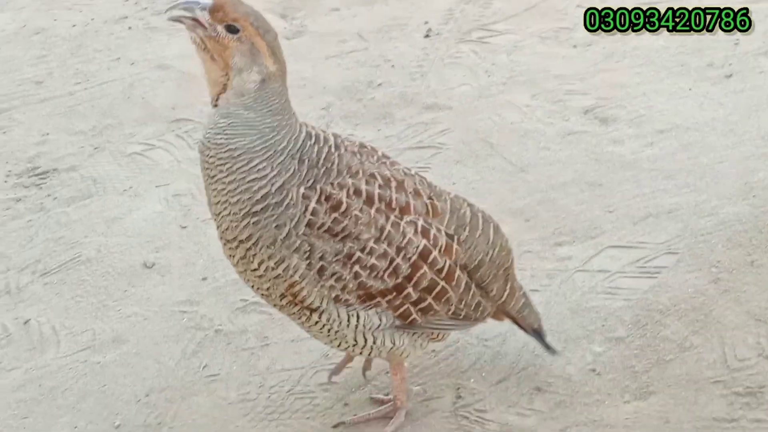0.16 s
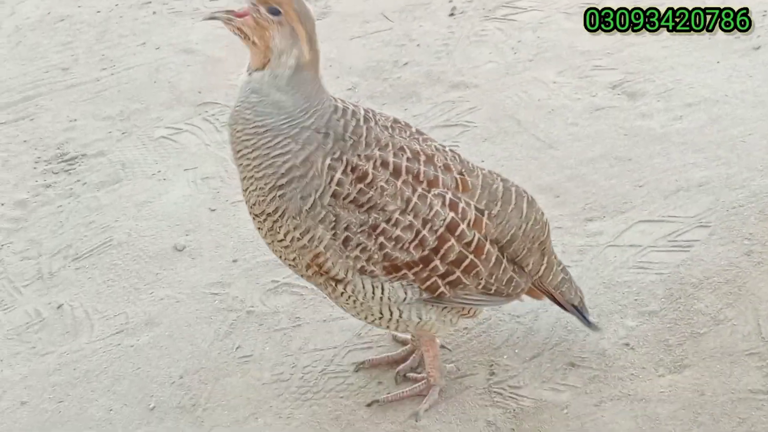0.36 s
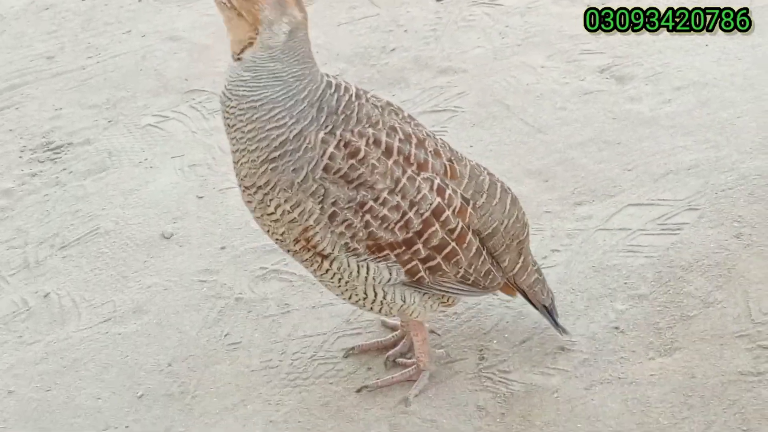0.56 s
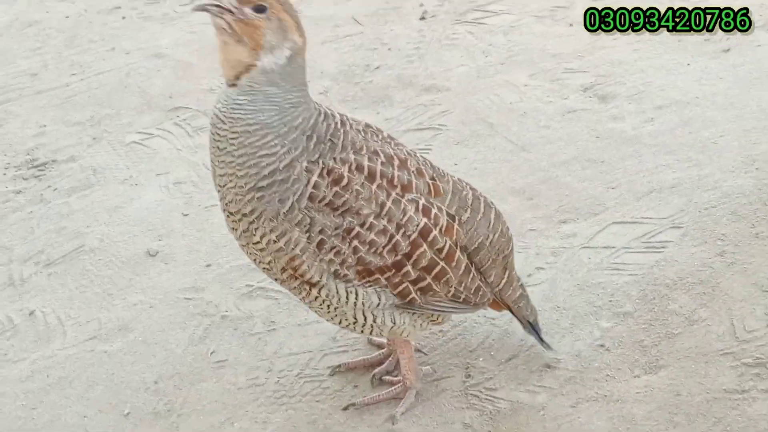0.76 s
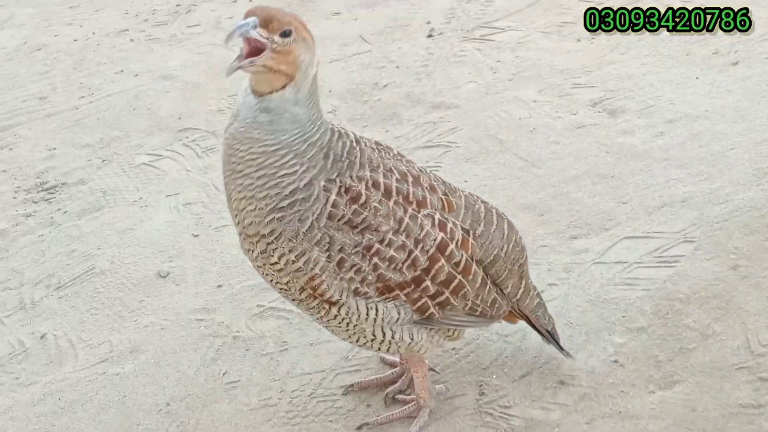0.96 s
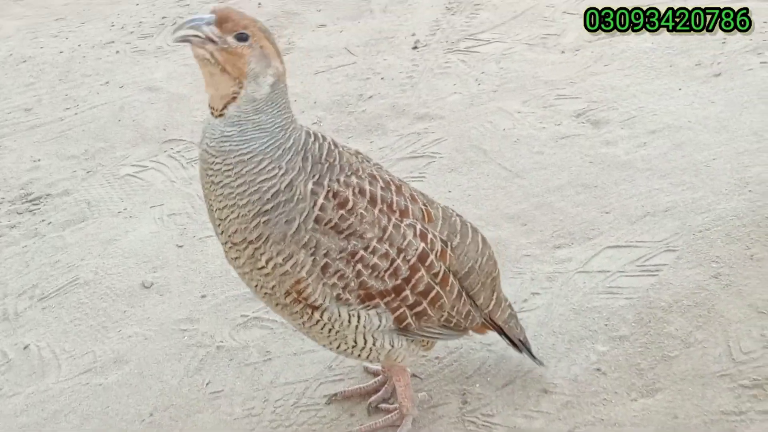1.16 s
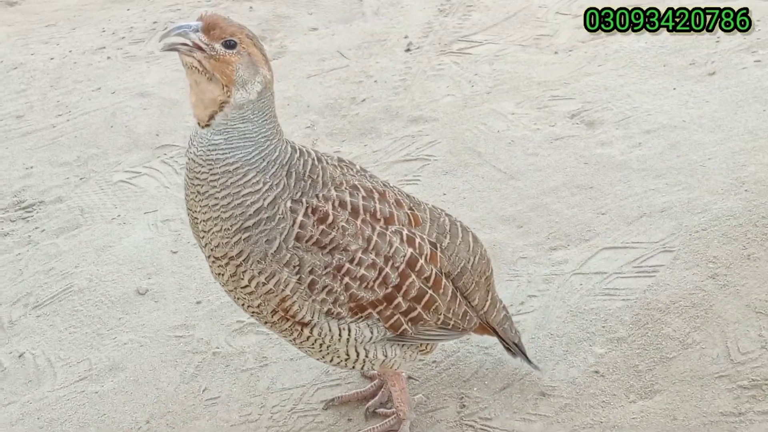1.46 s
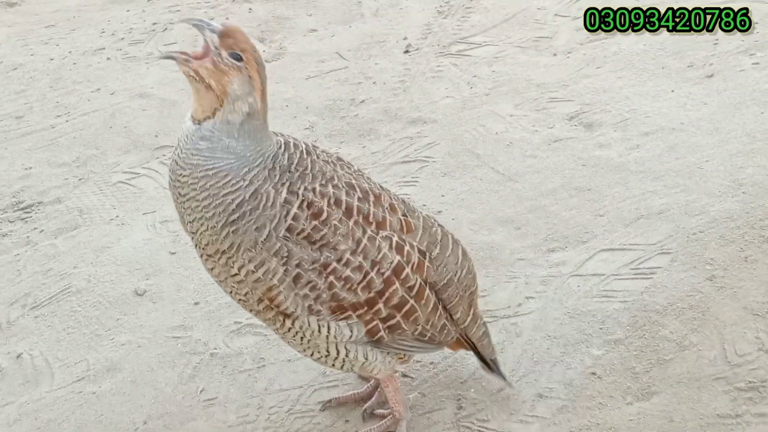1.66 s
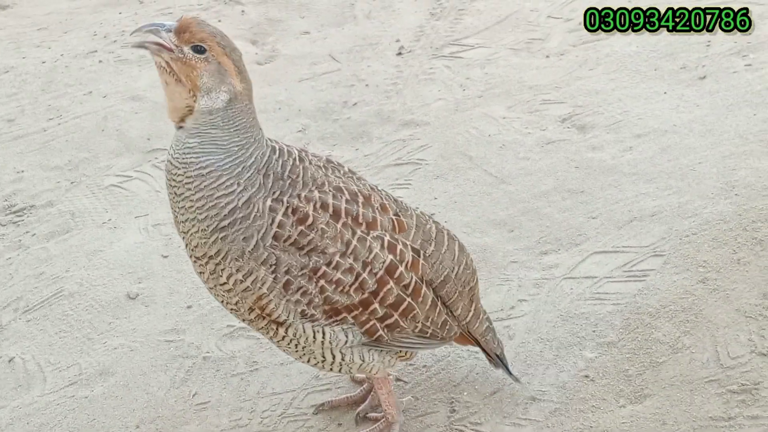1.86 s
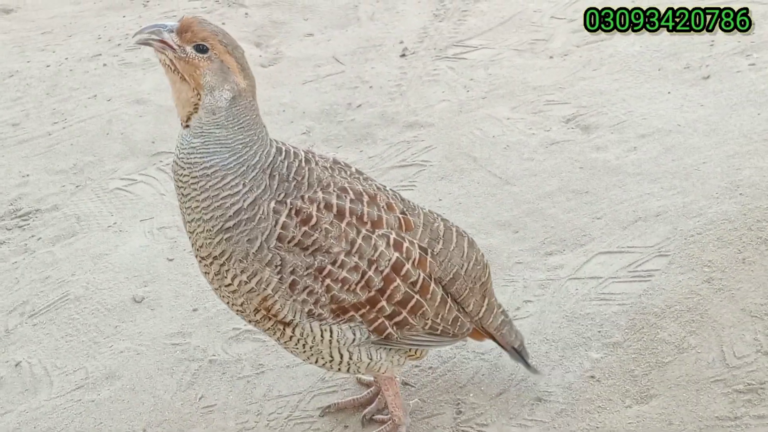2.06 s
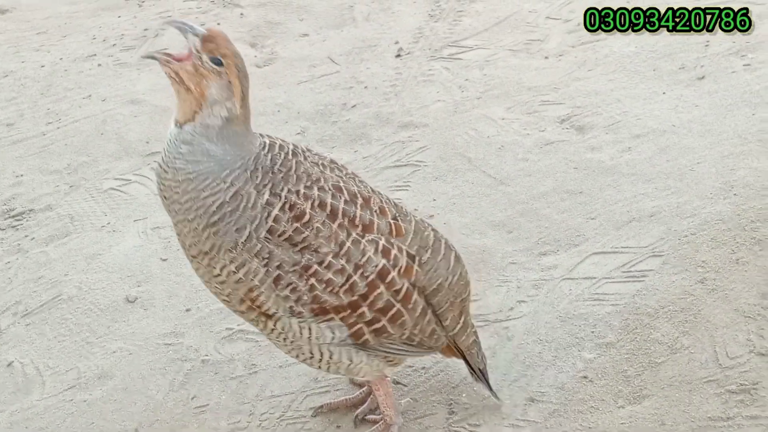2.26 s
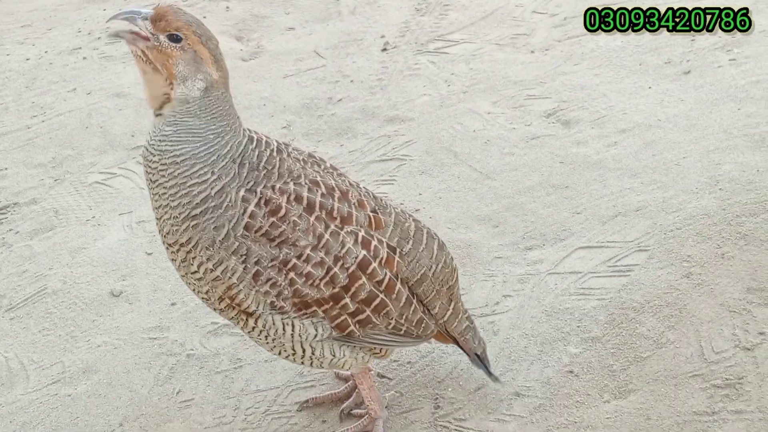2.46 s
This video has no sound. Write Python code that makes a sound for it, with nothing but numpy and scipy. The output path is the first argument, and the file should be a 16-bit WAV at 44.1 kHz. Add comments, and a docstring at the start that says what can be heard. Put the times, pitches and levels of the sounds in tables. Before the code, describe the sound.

Close partridge-like bird repeating a quick phrase of rasps and a piercing whistle outdoors.

```python
"""A short falling note, then a francolin's phrases, one about every 0.62 s, close by on dusty ground.
Each phrase: two rasping notes, a gulp, a loud clear whistle, a hoarse rattle with a pip, a falling note.
The two sides of the syrinx clash in the rasps; the throat opens with the gulp and rings in the rattle.
The whistle overloads the microphone. The yard adds a faint tail and two weak echoes,
over still air and one faint rustle."""
import sys
import numpy as np
from scipy import signal
from scipy.fft import rfft, irfft, next_fast_len
from scipy.io import wavfile

SR = 44100
rng = np.random.default_rng(int(sys.argv[2]) if len(sys.argv) > 2 else 0)


def to_wav(sig):
    """Store sig (one row per channel, or 1-D mono) as 16-bit WAV at the path in sys.argv[1].

    Samples outside -1..1 are clipped; the rate is SR.
    """
    pcm = np.clip(np.atleast_2d(sig), -1, 1) * 32767
    pcm = np.round(pcm).astype(np.int16)
    wavfile.write(sys.argv[1], SR, pcm.T)  # frames by channels


N = 114660
LEAD_IN = SR // 3  # samples; the bird is already calling at t = 0
T = np.arange(-LEAD_IN, N) / SR
VOICE_JITTER = .009  # relative pitch spread, pips and falling notes
PIP_EDGE_S = .002

# falling notes: start/s, level/dB
FALL_NOTES = [(-.025, -17), (0.617, -13.5), (1.231, -14), (1.863, -11.5), (2.484, -12.5)]
# rasp noise spectrum: f/Hz, level/dB
RASP_SPECTRUM = [(50, -41), (180, -49.5), (350, -19.5), (600, -13.5), (850, -13), (1100, -5.5), (2300, 4),
                 (2800, -5), (3600, -2), (4500, -22), (6000, -20.5), (7200, -49), (9500, -29.5),
                 (12000, -34), (15500, -41)]
# pips: start/s, length/s, level/dB, f/Hz
PIP_NOTES = [(0.543, 0.0051, -22.5, 2220), (0.572, 0.014, -13.5, 2222), (1.188, 0.013, -13.5, 2216),
             (1.818, 0.013, -12, 2213), (2.438, 0.014, -14, 2205)]


def from_db(db):
    """Decibels to gain."""
    return 10 ** (np.asarray(db) / 20)


def rms_one(x):
    """Scale to rms 1."""
    return x / np.sqrt(np.mean(x ** 2) + 1e-20)


def along(rows, x):
    """Remaining columns, interpolated at x in the first."""
    first, *columns = np.transpose(rows)
    return [np.interp(x, first, c) for c in columns]


def noise(spectrum):
    """Noise with the given spectrum, rms 1."""
    hz, db = np.transpose(spectrum)
    size = next_fast_len(len(T))
    bins_hz = np.maximum(np.fft.rfftfreq(size, 1 / SR), 1)
    gain = from_db(np.interp(np.log(bins_hz), np.log(hz), db))
    return rms_one(irfft(rfft(rng.standard_normal(size)) * gain, size)[:len(T)])


def waver(rate_hz):
    """Random unsteadiness up to rate_hz, rms 1."""
    lowpass = signal.butter(2, rate_hz, fs=SR, output="sos")
    return rms_one(signal.sosfilt(lowpass, rng.standard_normal(len(T))))


def gate(start_s, end_s, attack_s, release_s):
    """Exponential rise up to start_s, hold until end_s, exponential decay."""
    exponent = np.maximum(start_s - T, 0) / attack_s + np.maximum(T - end_s, 0) / release_s
    return np.exp(-np.minimum(exponent, 40))


def voice(hz, envelope, harmonics_db):
    """Vibrating membrane: harmonics of a moving pitch, each at its rms level."""
    out, on = np.zeros(len(T)), envelope > 1e-4
    phase = 2 * np.pi * np.cumsum(hz[on]) / SR
    for k, db in enumerate(harmonics_db, 1):
        out[on] += from_db(np.broadcast_to(db, T.shape)[on]) * np.sin(k * phase)
    return np.sqrt(2) * envelope * out


def falling_notes():
    """The note slides down and roughens; its octave swells crossing the throat resonance."""
    # note contour: t from start/s, f/Hz, tone/dB, octave/dB, overtones/dB, rasp/dB
    contour = [(0, 2205, 0, -17, 0, -30), (.009, 2140, -.5, -16, -2, -36), (.02, 1960, -4, -5, -13, -34),
               (.036, 1630, -9, -11, -24, -30), (.045, 1480, -21, -24, -36, -22),
               (.062, 1300, -38, -44, -48, -38)]
    # harmonics 3-7: level re overtones column/dB
    offsets_db = [-16, -15, -26, -35, -27]
    edge_s, rough_db, roughen_s = .0012, 2.5, .025
    out, jitter = 0, 1 + VOICE_JITTER * waver(400)
    rasp, shimmer = noise(RASP_SPECTRUM), waver(350)
    for start_s, level_db in FALL_NOTES:
        t = T - start_s
        hz, tone_db, octave_db, overtones_db, rasp_db = along(contour, t)
        envelope = gate(start_s, start_s + contour[-1][0], edge_s, edge_s)
        harmonics_db = [tone_db, octave_db] + [overtones_db + db for db in offsets_db]
        roughness = from_db(rough_db * np.clip(t / roughen_s, 0, 1) * shimmer)
        tone = voice(hz * jitter, envelope, harmonics_db) * roughness
        out += from_db(level_db) * (tone + rasp * envelope * from_db(rasp_db))
    return out


def rasping_notes():
    """The two sides of the syrinx clash in a beating rasp; the lower voice wins and slides down."""
    # notes: crest/s, crest f/Hz, hold after crest/s, tone/dB, octave re tone/dB,
    # upper voice/dB, rasp/dB, roughness/1
    notes = [(0.138, 1853, 0.028, -14.5, 3.5, -13.5, -19.5, 0.02),
             (.250, 1722, .029, -11, -1, -16, -21, .12), (.779, 1797, 0.028, -12, 1, -11, -22, 0.04),
             (0.898, 1483, 0.025, -15, -9, -24.5, -18, 1.03),
             (1.398, 1815, 0.033, -15, -1.5, -9.5, -22.5, 0.26),
             (1.518, 1523, 0.023, -16.5, -7.5, -18, -17.5, 0.86),
             (2.035, 1848, 0.035, -14, 0, -13.5, -22, 0.16),
             (2.152, 1559, 0.023, -9, -12.5, -20.5, -21.5, 0.25)]
    # level offsets: t from crest/s, tone/dB, octave/dB, upper voice/dB, rasp/dB
    contour = [(-.028, -48, -21.5, -57.5, -33), (-.02, -23.5, -1, -74, -7.5), (-.012, -15, 2, -5, 5.5),
               (-.005, -8, 7.5, 4.5, 6.5), (.003, 0, 1.5, -8.5, 1), (.011, -0.5, -3, -36.5, -6),
               (.023, -0.5, -15.5, -31, -13), (.04, -5, -37, -47, -8.5)]
    rise_hz_per_s, end_hz, fall_s, edge_s = 16000, 1306, .016, .003
    upper_peak_hz, sag_hz_per_s2 = 2264, 500000
    beat_depth, jitter_depth, shimmer_db = .53, .07, -.7  # at roughness 1
    out, rasp = 0, noise(RASP_SPECTRUM)
    jitter, shimmer, upper_jitter = waver(340), waver(230), 1 + .025 * waver(400)
    beat_hz = 400 * (1 + .221 * waver(205))
    beat = np.sin(2 * np.pi * np.cumsum(beat_hz) / SR)
    for crest_s, crest_hz, hold_s, tone_db, octave_db, upper_db, rasp_db, roughness in notes:
        t = T - crest_s
        d_tone, d_octave, d_upper, d_rasp = along(contour, t)
        envelope = gate(crest_s + contour[0][0], crest_s + hold_s, edge_s, edge_s)
        slide = np.exp(-(np.maximum(t, 0) / fall_s) ** 1.37)
        lower_hz = end_hz + (crest_hz - end_hz) * slide + rise_hz_per_s * np.minimum(t, 0)
        lower_hz *= 1 + jitter_depth * roughness * jitter
        second_db = octave_db + d_octave
        lower = voice(lower_hz, envelope, [0, second_db, second_db - 24])
        lower *= from_db(tone_db + d_tone + shimmer_db * roughness * shimmer)
        upper_hz = (upper_peak_hz - sag_hz_per_s2 * t ** 2) * upper_jitter
        upper = voice(upper_hz, envelope, [upper_db + d_upper])
        out += (lower + upper) * (1 + beat_depth * roughness * beat)
        out += rasp * envelope * from_db(rasp_db + d_rasp)
    return out


def gulps():
    """Soft thump, sharp click and faint hiss as the throat opens for the whistle."""
    # throat openings: t/s, thump/dB, f/Hz, click/dB
    openings = [(0.329, -28, 329, -12), (0.956, -26.5, 352, -58), (1.588, -23.5, 307, -12),
                (1.597, -38, 261, -30), (2.199, -24, 236, -11.5), (2.21, -37, 228.6, -7)]
    # click spectrum: f/Hz, level/dB
    click_spectrum = [(300, 8), (1500, -37.5), (3100, 14.5), (4600, -26), (8000, -23), (15500, -32.5)]
    # hiss spectrum: f/Hz, level/dB
    hiss_spectrum = [(300, -14), (1500, -39), (2900, 15), (4600, -2), (6000, -28.5), (8000, -0.5),
                     (10500, -9), (12000, -17), (15500, -23.5)]
    click_lag_s, hiss_lead_s, hiss_db = .001, .0063, -34
    click, hiss = noise(click_spectrum), noise(hiss_spectrum)
    out, jitter = 0, 1 + .13 * waver(200)
    for at_s, thump_db, hz, click_db in openings:
        click_s = at_s + click_lag_s
        out += voice(hz * jitter, gate(at_s, at_s, .004, .004), [thump_db])
        out += click * from_db(click_db) * gate(click_s, click_s, .0003, .002)
        out += hiss * from_db(hiss_db) * gate(at_s - hiss_lead_s, at_s, .03, .03)
    return out


def whistles():
    """Loud, nearly pure note; rushing air swells in its middle."""
    # notes: start/s, end/s, release/s, level/dB, breath/dB
    notes = [(-.27, -0.078, .003, 5.5, -20), (0.3542, 0.519, 0.0014, 3, -17),
             (.9735, 0.9756, .0015, -7.5, -36), (0.9808, 1.136, 0.013, 2.5, -18.5),
             (1.616, 1.776, 0.0043, 3, -19.5), (2.2267, 2.397, 0.0029, 3.5, -17)]
    # pitch of the lead-in whistle: t/s, f/Hz
    lead_in_pitch = [(-.27, 3000), (-.22, 3350), (-.095, 3305)]
    # pitch, one curve per phrase: t/s, f/Hz
    pitch_curves = [
        [(0.352, 3092), (0.374, 3355), (0.396, 3420), (0.446, 3320), (0.504, 3313), (0.525, 3425)],
        [(0.975, 2974), (0.983, 3145), (1.021, 3440), (1.055, 3474), (1.135, 3303), (1.16, 3467)],
        [(1.614, 3170), (1.654, 3345), (1.712, 3277), (1.772, 3384), (1.785, 3530)],
        [(2.226, 3251), (2.236, 3353), (2.258, 3426), (2.276, 3397), (2.308, 3263), (2.346, 3191),
         (2.378, 3220), (2.4, 3440)],
    ]
    # harmonics 1-4: level/dB
    harmonics_db = [-1.5, -42, -37.5, -47]
    # level offsets: share of note length/1, tone/dB, breath/dB
    contour = [(0, -1, -23), (.1, -1, -1.5), (.35, -1.5, 5), (.75, -1, 2), (.93, -2, -1.5), (1, -2, -15)]
    # breath spectrum: f/Hz, level/dB
    breath_spectrum = [(30, -35), (150, -0.5), (800, 0), (1600, -5), (2700, 7), (3900, 6.5), (4900, -24.5),
                       (7000, -10), (8300, -10), (9800, -32), (11500, -19.5), (15500, -32)]
    attack_s, jitter_depth, flutter_db, shimmer_db = .0017, .0019, 1.0, .35
    hz, = along([row for curve in [lead_in_pitch, *pitch_curves] for row in curve], T)
    hz *= 1 + jitter_depth * waver(210)
    breath = noise(breath_spectrum) * from_db(flutter_db * waver(150))
    out, shimmer = 0, from_db(shimmer_db * waver(90))
    for start_s, end_s, release_s, level_db, breath_db in notes:
        d_tone, d_breath = along(contour, (T - start_s) / (end_s - start_s))
        envelope = gate(start_s, end_s, attack_s, release_s)
        out += voice(hz, envelope, harmonics_db) * from_db(level_db + d_tone) * shimmer
        out += breath * envelope * from_db(breath_db + d_breath)
    return out


def rattles():
    """Irregular flutter rings the throat over a weak hum, catching before each pip and falling note."""
    # rattles: start/s, end/s, level/dB
    spans = [(0.542, 0.596, -24), (1.153, 1.209, -24), (1.794, 1.845, -22), (2.405, 2.467, -25)]
    # throat spectrum: f/Hz, level/dB
    throat_spectrum = [(40, -57), (250, -37), (700, -48), (1700, -95), (2250, 6.5), (2700, -6.5), (3450, 6),
                       (3900, 1), (4900, -21.5), (6700, -19), (7700, -32.5), (9000, -19), (11500, -30.5),
                       (15500, -34)]
    edge_s, flutter_db, hum_db, pip_duck = .0044, 3, -42, .26
    catch_lead_s, catch_decay_s = .002, .0016
    envelope = sum(from_db(db) * gate(start_s, end_s, edge_s, edge_s) for start_s, end_s, db in spans)
    pip_on = sum(gate(s, s + length_s, PIP_EDGE_S, PIP_EDGE_S) for s, length_s, _, _ in PIP_NOTES)
    envelope *= 1 - np.clip(pip_duck * pip_on, 0, 1)
    onsets = [(s, db) for s, _, db, _ in PIP_NOTES] + list(FALL_NOTES)
    catches = 0
    for onset_s, db in onsets:
        catch_s = onset_s - catch_lead_s
        catches += from_db(db) * gate(catch_s, catch_s, catch_decay_s / 2, catch_decay_s)
    hum_hz = 1080 * (1 + .1 * waver(150))
    hum = voice(hum_hz, envelope / envelope.max(), [hum_db])
    return hum + noise(throat_spectrum) * (envelope * from_db(flutter_db * waver(120)) + catches)


def pips():
    """The voice locks briefly onto one reedy pitch."""
    # harmonics 1-7: level/dB
    harmonics_db = [1, -13.5, -21.5, -17, -38, -32, -25]
    out, jitter = 0, 1 + VOICE_JITTER * waver(300)
    for start_s, length_s, db, hz in PIP_NOTES:
        envelope = gate(start_s, start_s + length_s, PIP_EDGE_S / 2, PIP_EDGE_S)
        out += voice(hz * jitter, envelope, harmonics_db) * from_db(db)
    return out


def yard(x):
    """Scatter from nearby ground, a faint long tail and two blurred echoes."""
    # scatter and tail spectrum: f/Hz, level/dB
    tail_spectrum = [(100, 24), (900, -55), (1700, 12), (2400, -1), (3300, -2.5), (4500, 7.5), (9000, 4),
                     (15000, -10.5)]
    # echoes: delay/s, spread/s, level/dB
    reflections = [(0.047, 0.011, -32.5), (0.351, 0.021, -41.5)]
    # echo spectrum: f/Hz, level/dB
    echo_spectrum = [(100, -1.5), (1000, -6), (1700, 2.5), (2400, -2), (3300, -5.5), (9000, -1.5),
                     (15000, -17)]
    ground, tail = (-16.5, .047), (-29.5, 1)  # level/dB, T60/s
    predelay_s = .013
    t, decays, echoes = T - T[0], 0, 0
    for db, t60_s in (ground, tail):
        decay = from_db(-60 * np.minimum(t / t60_s, 10)) * (t > predelay_s)
        decays += from_db(db) * decay / np.linalg.norm(decay)
    for delay_s, spread_s, db in reflections:
        burst = gate(T[0] + delay_s, T[0] + delay_s, spread_s / 10, spread_s)
        echoes += from_db(db) * burst / np.linalg.norm(burst)
    response = decays * noise(tail_spectrum) + echoes * noise(echo_spectrum)
    return signal.fftconvolve(x, response)[:len(T)]


def background():
    """Still outdoor air and one faint dry rustle."""
    # air spectrum: f/Hz, level/dB
    air_spectrum = [(25, -20), (55, -11.5), (90, 3), (130, 0), (250, -14.5), (600, -25), (1500, -13),
                    (4000, -14.5), (8000, -27), (10500, -41), (15500, -41)]
    # rustle spectrum: f/Hz, level/dB
    rustle_spectrum = [(300, -18), (2500, -7), (4000, 14), (5500, -18), (9500, -9), (11000, -24),
                       (15500, -28)]
    air_db, rustle_db = -55, -40
    rustle_envelope = gate(1.363, 1.49, .02, .02) * from_db(rustle_db + 2.3 * waver(50))
    return from_db(air_db) * noise(air_spectrum) + rustle_envelope * noise(rustle_spectrum)


def scene():
    """Bird, reflections and background; mono."""
    bird = rasping_notes() + gulps() + whistles() + rattles() + pips() + falling_notes()
    return (bird + yard(bird) + background())[None, LEAD_IN:]


def record(dry):
    """The microphone overloads on the whistle, slightly lopsided; deep bass and the top are cut."""
    ceiling, hardness, bias = .88, 5.0, .018
    low_cut_hz, high_cut_hz = 67, 15550
    oversampled = signal.resample_poly(dry, 4, 1, axis=1) + bias
    saturated = oversampled / (3.5 + np.abs(oversampled / ceiling) ** hardness) ** (1 / hardness) - bias
    clipped = signal.resample_poly(saturated, 1, 4, axis=1)
    thinned = signal.sosfilt(signal.butter(2, low_cut_hz, "high", fs=SR, output="sos"), clipped)
    lowpass = signal.firwin(601, high_cut_hz, fs=SR, window="blackman")
    return signal.fftconvolve(thinned, lowpass[None], "same")


dry = scene()
out = record(dry)
to_wav(out)
```